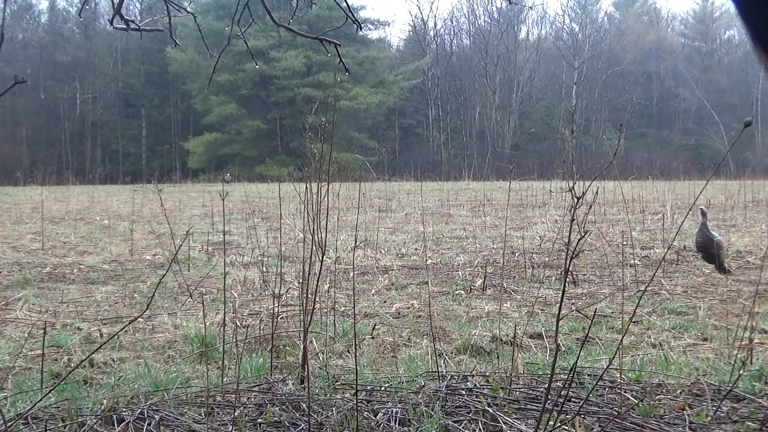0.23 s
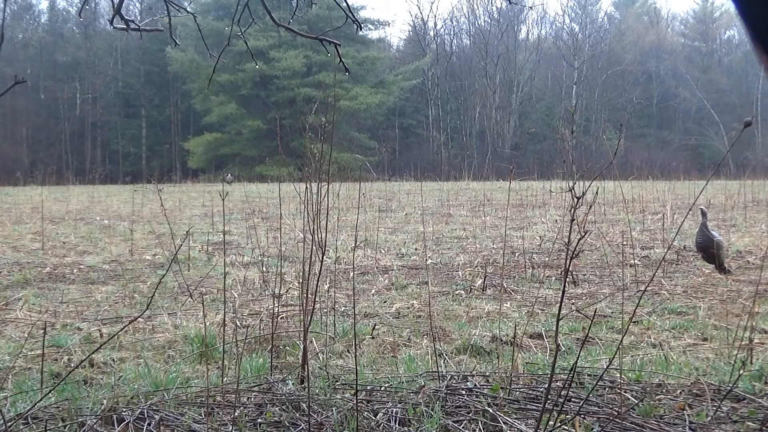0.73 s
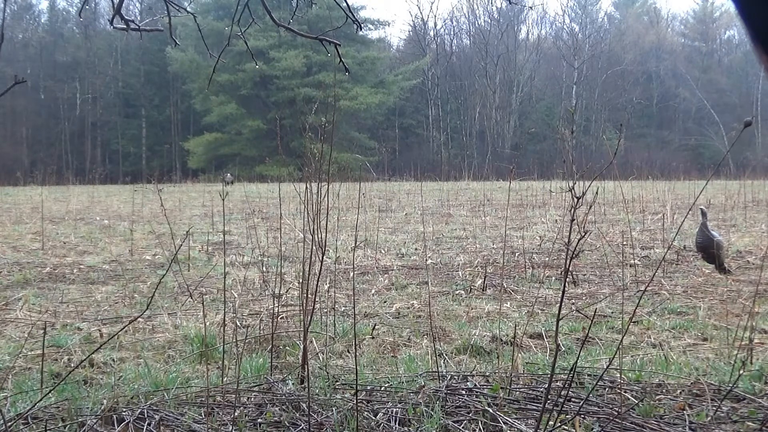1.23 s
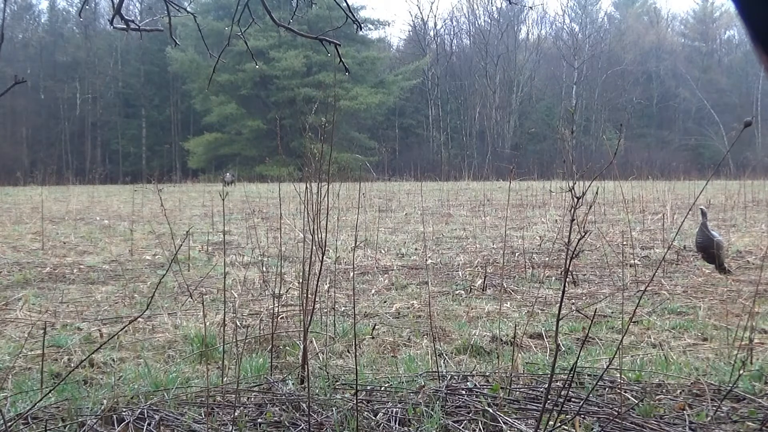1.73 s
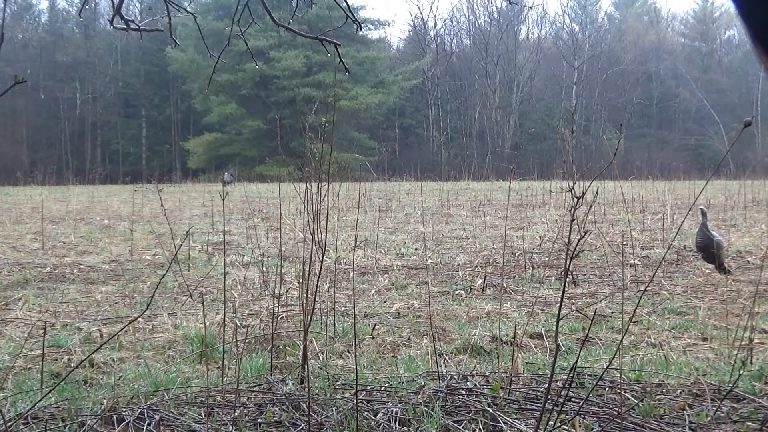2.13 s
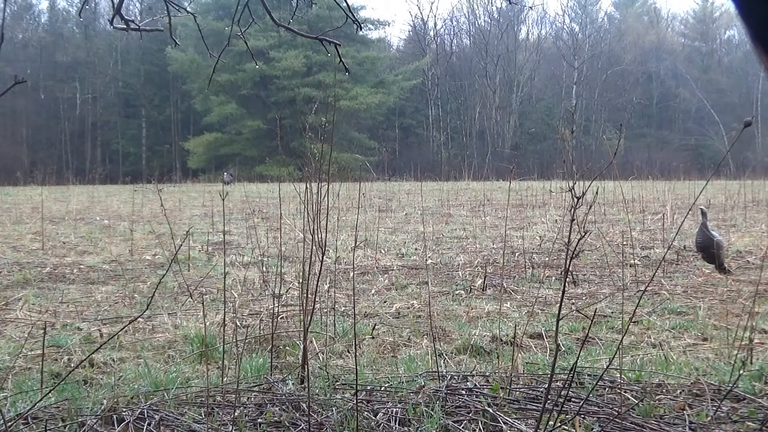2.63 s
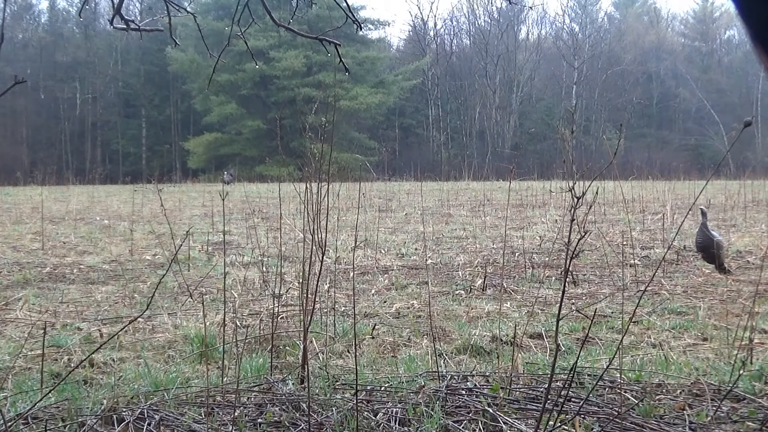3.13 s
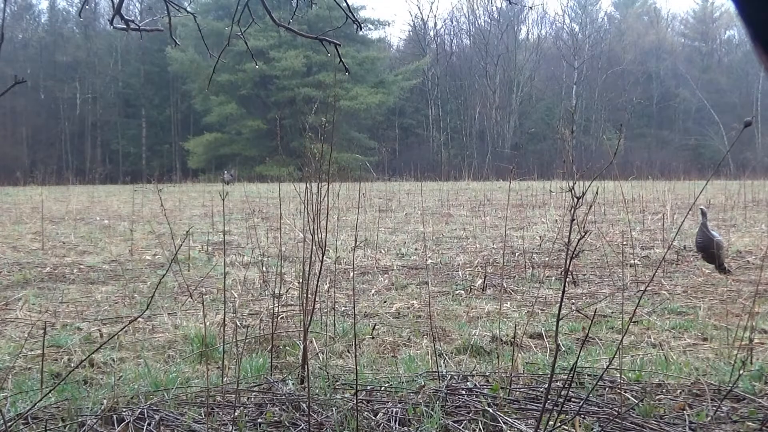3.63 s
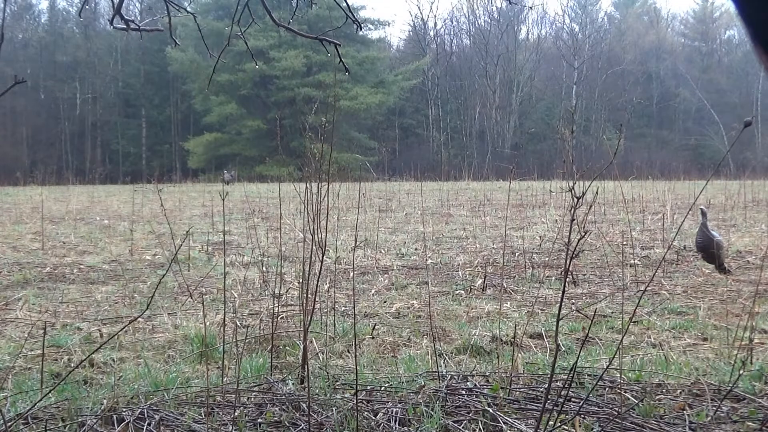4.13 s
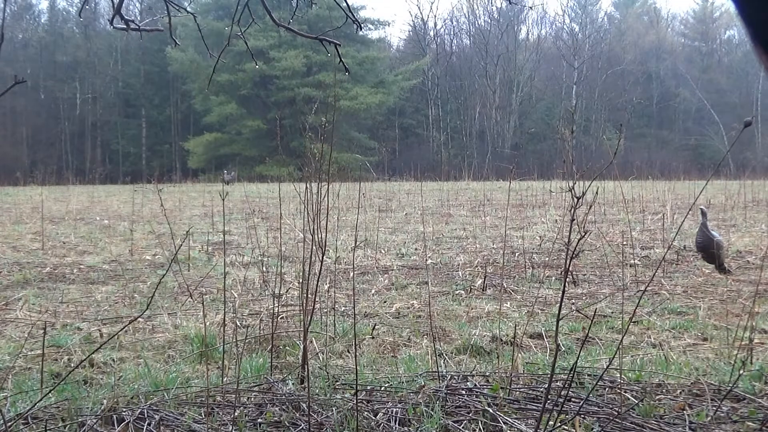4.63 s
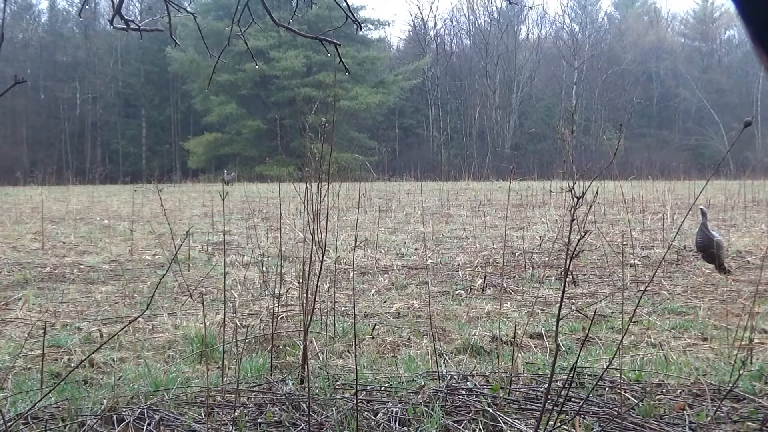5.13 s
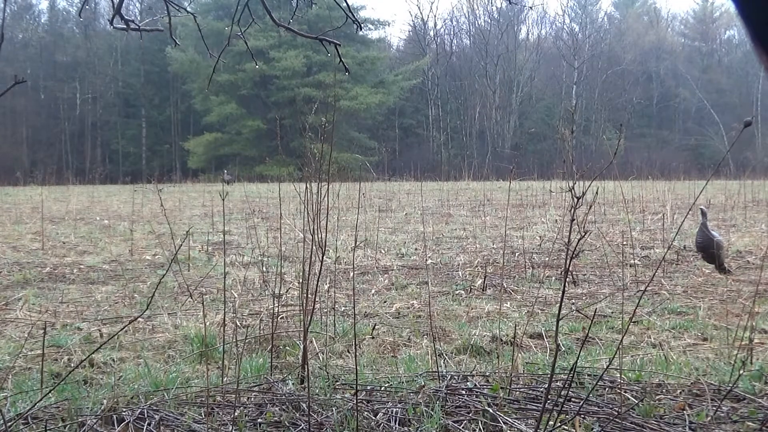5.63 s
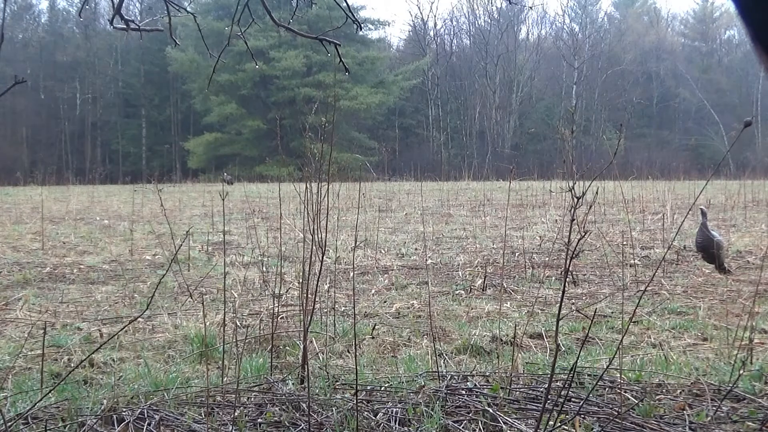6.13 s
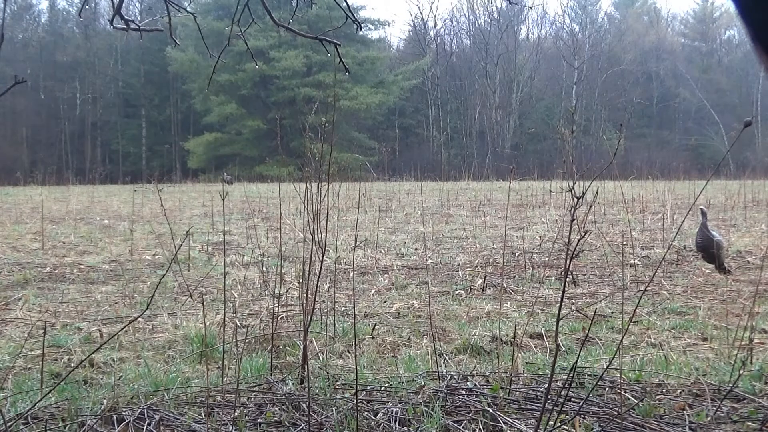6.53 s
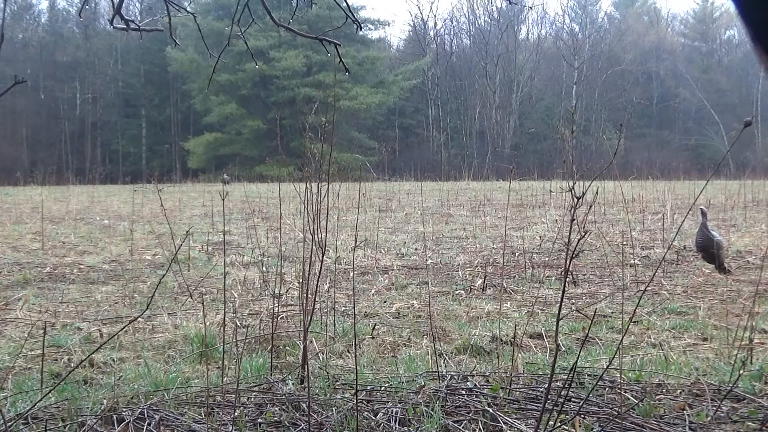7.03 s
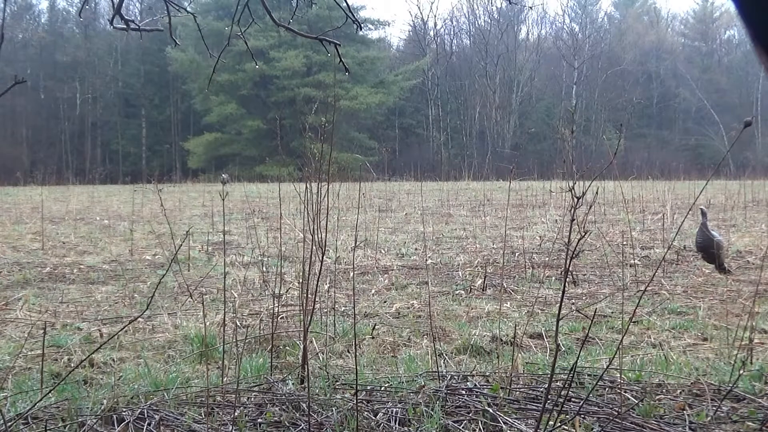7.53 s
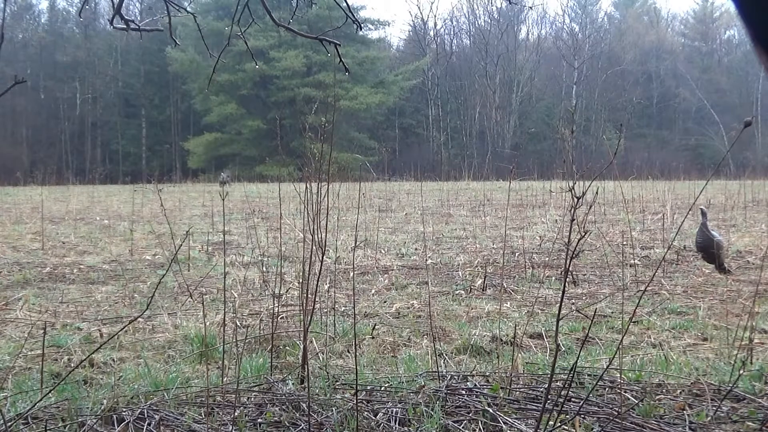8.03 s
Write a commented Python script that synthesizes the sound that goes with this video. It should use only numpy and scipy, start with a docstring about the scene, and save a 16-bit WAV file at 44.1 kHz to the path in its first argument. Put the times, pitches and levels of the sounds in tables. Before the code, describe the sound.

Outdoor stereo pickup at the edge of an open field. A tiny click-like chirp leads into evenly spaced raspy turkey yelps, very near, swelling to full loudness and stopping abruptly. Brush ticks and one thin distant bird peep follow, then a much softer gobble of quick tumbling syllables with woodland echo. It fades into quiet air, faint low hum and a few ticks.

```python
"""Close, raspy turkey yelps at the edge of an open field: membrane pulses and air puffs ring a throat.
Later a turkey gobbles, a rattle of short syllables; the nearest trees reflect it and the woods echo it.
Noise bursts make ticks and a scuff in the brush, a sine a far bird; a low hum and a rush lie underneath.
Loud yelps push the gain down at once, and it creeps back over several seconds."""
import sys
import numpy as np
from scipy import signal
from scipy.fft import rfft, irfft, next_fast_len
from scipy.io import wavfile
from scipy.ndimage import uniform_filter1d, minimum_filter1d, map_coordinates

SR = 44100
rng = np.random.default_rng(int(sys.argv[2]) if len(sys.argv) > 2 else 0)


def store_wav(level_fs):
    """Save 16-bit WAV to argv[1]."""
    pcm = np.round(np.clip(np.atleast_2d(level_fs), -1, 1) * 32767)
    wavfile.write(sys.argv[1], SR, pcm.T.astype(np.int16))


N = 365280
TOP_HZ = 15850  # upper band limit


def yelps():
    """Each yelp falls from a thin whistle to a loud rasp, then bends; a clean fundamental runs under the rasp."""
    # Each row: start in seconds, pitch drop time in seconds, release time after the start in seconds,
    # pitch after the drop in Hz, closing bend in octaves, lateness of the bend (exponent, 1 = even),
    # level in dB, closing sag in dB, roughness 0-1, treble boost in dB, chest boost in dB.
    yelp_rows = [ (.501, 0.007, 0.017, 815, -0.0195, 0.92, -35.5, 3, 1, 2, 15),
                 (.526, .016, 0.049, 845, .05, 1.1, -43.5, 3, .7, 1, -6),
                 (.826, .082, 0.1, 555, 0.31, 1.2, -24, 3.3, 0.7, 7.5, 16),
                 (1.22, 0.04, .11, 583, 0.6, 0.84, -19, 8.8, 0.35, -0.5, 4),
                 (1.57, 0.058, 0.12, 539.4, 0.12, 3, -7, 8.4, 0.43, 3.5, 4.5),
                 (1.947, 0.042, 0.1, 593, .55, 3.5, -12, 9, 0.23, 4.5, 7),
                 (2.303, .032, 0.12, 554.2, .15, 3, -6, 2.3, 0.427, 3, 2),
                 (2.674, 0.021, .091, 546.8, 0.088, 3.4, -6.5, 6.6, 0.36, 1.5, 2),
                 (2.998, .016, 0.0824, 533, -.1, 1.05, -5.5, 1.1, 0.298, -1.5, 0), ]
    # Throat resonance. Each row: frequency in Hz, gain in dB.
    throat_shape = [(330, -36.5), (490, -21.5), (800, -8.5), (1150, -6.3), (1420, -3.5), (1680, -4),
                    (2250, -5.5), (2600, -12.5), (3050, -7.5), (3300, -6.5), (3700, -15), (4400, -22.5),
                    (5700, -28.5), (7800, -16), (9300, -29), (11500, -63)]
    # Stereo balance. Each row: frequency in Hz, left minus right in dB.
    pan_points = [(380, 0), (950, -2.5), (2380, -4.9), (5980, 0.5), (15000, -2)]
    # Stereo phase. Each row: frequency in Hz, lead of left over right in radians.
    lead_points = [(0, 0), (1640, 0.085), (5080, -0.79), (6980, -0.14), (7840, 0.2), (8350, -0.2),
                   (15800, 0.0)]
    whistle_base_db, whistle_db_per_octave, whistle_rough_db = -13.5, 13, -9.5
    bite_hz = 4430

    track = np.zeros((2, N))
    t = np.arange(SR // 5) / SR
    for (start, drop, length, base_hz, lift, lateness, level_db, sag_db,
         rough, treble_db, chest_db) in yelp_rows:
        pitch_hz, swell_db, bite_db = yelp_gesture(t, drop, length, base_hz, lift, lateness, sag_db)
        # above 580 Hz the overtones break up further into hoarse noise
        octaves_up = np.log2(np.maximum(pitch_hz, 580) / 580)
        hoarse = np.clip(rough + .1 + .9 * octaves_up, 0, .92)
        source = syrinx(pitch_hz, hoarse, jitter=.12, jitter_rate=600,
                        flutter_hz=135, flutter=.3 + .8 * min(rough, .45))

        def voicing(hz):
            treble = treble_db * above(hz, 2500)
            chest = chest_db * (1 - above(hz, 1550))
            return throat_rings(hz) * amp(treble + chest)

        rasp = filtered(resonate(source, throat_shape), voicing)
        bite = filtered(rasp, lambda hz: above(hz, bite_hz))
        rasp = rasp + (amp(bite_db) - 1) * bite
        rasp = nearby(rasp, scatter_db=-3, t60=.06, width=1.3)

        # the higher the pitch, the more of the voice lies in its fundamental
        whistle_db = (whistle_base_db + whistle_db_per_octave * np.log2(pitch_hz / 550)
                      + whistle_rough_db * rough)
        whistle_hz = pitch_hz * (1 + .02 * wobble(250, len(t)))
        whistle = np.sqrt(2) * np.sin(2 * np.pi * np.cumsum(whistle_hz) / SR)
        voice = evened(rasp, size=550) + amp(whistle_db) * whistle
        voice = voice * amp(level_db + swell_db)
        for ear, sound in zip(track, voice):
            add(ear, start, sound)

    sides = np.array([[.5], [-.5]])

    def placement(hz):
        return amp(sides * along(pan_points, hz)) * np.exp(1j * sides * along(lead_points, hz))

    close = nearby(track, scatter_db=-9.5, t60=0.1, width=0.26, tilt=0.7)
    return filtered(close, placement)


def yelp_gesture(t, drop, length, base_hz, lift, lateness, sag_db):
    """Pitch, relative level and bite: it swells as the pitch drops, sags and dulls as it closes, is let go."""
    entry_octaves, entry_db, release_db_per_s, bite_closing_db = .9, 29.5, 1055, -3.5
    entering = np.maximum(1 - t / drop, 0)
    closing = np.clip((t - drop) / max(length - drop, .005), 0, 1.2)
    pitch_hz = base_hz * 2 ** (entry_octaves * entering ** 2.2 + lift * closing ** lateness)
    entry = -entry_db * entering ** 2
    sag = -sag_db * np.minimum(closing, 1) ** 2
    release = -release_db_per_s * np.maximum(t - length, 0)
    return pitch_hz, entry + sag + release, bite_closing_db * closing ** 2


def throat_rings(hz):
    """Narrow resonances of the yelping throat, added to the direct sound."""
    # Each row: centre in Hz, width in Hz, level of the added resonance in dB.
    ring_rows = [(1507, 59, 4.5), (1697, 51, 11), (1800, 68, 9.5), (1970, 41, 4), (3070, 70, -3),
                 (3510, 65, 4), (8050, 110, -12)]
    response = 1
    for centre, width, db in ring_rows:
        response = response + amp(db) * 1j * hz * width / (centre ** 2 - hz ** 2 + 1j * hz * width)
    return response


def syrinx(pitch_hz, rough, jitter, jitter_rate, flutter_hz, flutter):
    """Membrane pulses; roughness scatters their timing and trades them for puffs of air."""
    size = len(pitch_hz)
    jittered_hz = pitch_hz * (1 + jitter * rough * wobble(jitter_rate, size))
    phase = 2 * np.pi * np.cumsum(jittered_hz) / SR
    pulses = unit(sum(np.cos(k * phase) * (k * pitch_hz < TOP_HZ) for k in np.arange(1, 29)))
    air = unit(rng.standard_normal(size) * (1 + np.cos(phase)))
    air = filtered(air, lambda hz: hz ** 2 / (hz ** 2 + 750 ** 2))
    # slower, uneven flapping of the membrane puts sidebands beside each harmonic
    flap_hz = flutter_hz * (1 + .45 * wobble(130, size))
    flap = np.sin(2 * np.pi * np.cumsum(flap_hz) / SR)
    share = np.clip(rough, 0, 1)
    return (np.sqrt(1 - share) * pulses + np.sqrt(share) * air) * (1 + flutter * flap)


def gobble():
    """A rattle of short syllables, each with a hollow body and a bright rasp from the same membrane."""
    # Each row: centre in seconds, length scale in seconds, pitch at the centre in Hz, body level in dB,
    # body centre in Hz, rasp level in dB, roughness 0-1.
    syllable_rows = [ (5.680, 0.021, 549.4, -20.5, 1670, -35, 0.21),
                     (5.743, 0.015, 646, -20.5, 1360, -23, 0.17), (5.815, .015, 641, -36, 1347, -37.5, 0.5),
                     (5.866, 0.013, 660, -26.5, 1600, -29, .25),
                     (5.904, 0.017, 549.6, -25, 1225, -24, 0.32),
                     (5.943, .018, 630.7, -20.5, 1930, -24.5, .22),
                     (6.009, 0.0182, 598, -33, 1410, -32.5, .25), (6.062, .024, 604.6, -30, 1370, -29, 0.3),
                     (6.109, 0.023, 634, -22, 1800, -20.5, 0.26), (6.182, .028, 584, -36, 1982, -36.5, .25),
                     (6.219, 0.015, 600, -43, 1380, -34.5, .25),
                     (6.302, .017, 561.4, -31.5, 1760, -38, 0.09),
                     (6.362, 0.0179, 572, -28.5, 1920, -32.5, 0.02),
                     (6.387, 0.0175, 609, -39, 1800, -30.5, 0.38),
                     (6.467, 0.014, 556, -35.5, 1790, -39.5, 0), (6.521, 0.022, 585, -46, 1932, -42, 0.2), ]
    # Resonance of the body. Each row: frequency in Hz, gain in dB.
    body_shape = [(500, -29), (850, 4), (1080, -4), (1400, -7), (1750, 2), (2250, 0), (2800, -4),
                  (5000, -29)]
    # Resonance of the rasp. Each row: frequency in Hz, gain in dB.
    rasp_shape = [(1500, -36.5), (2300, -0.5), (2600, -3), (3200, 1), (5800, -4.5), (7500, -7),
                  (10000, -11.5), (15000, -26)]
    arch_octaves = .05  # pitch fall one length away from the centre
    # rasp centre in the first syllable; it sits lower when louder and falls as the gobble runs down
    first_rasp_hz, rasp_octaves_per_db, rasp_fall_octaves_per_s = 4600, -0.17, 1

    track = np.zeros(N)
    t = np.arange(-SR // 20, SR // 20) / SR
    first_s, *_, first_rasp_db, _ = syllable_rows[0]
    for s, length, pitch_hz, body_db, body_hz, rasp_db, rough in syllable_rows:
        arch = 2 ** (-arch_octaves * np.minimum((t / length) ** 2, 2))
        rasp_octaves = (rasp_octaves_per_db * (rasp_db - first_rasp_db)
                        - rasp_fall_octaves_per_s * (s - first_s))
        rasp_hz = first_rasp_hz * 2 ** rasp_octaves
        source = syrinx(pitch_hz * arch, rough, jitter=0.0885, jitter_rate=303,
                        flutter_hz=165.6, flutter=0.28)
        body = filtered(resonate(source, body_shape), lambda hz: hump(hz, body_hz, octaves=0.34) ** 2)
        rasp = filtered(resonate(source, rasp_shape), lambda hz: hump(hz, rasp_hz, octaves=0.7))
        # opens faster than it closes
        swell = 1 / np.cosh(2 * t / length) / np.cosh(1.06 * np.minimum(t, 0) / length)
        syllable = swell * (amp(body_db) * unit(body) + amp(rasp_db) * unit(rasp))
        # the head jerks, so every syllable meets the ground differently
        add(track, s + t[0], nearby(syllable, scatter_db=-6.5, t60=0.059, width=0)[0])
    return track


def trees(x):
    """The nearest trees throw back one dull copy."""
    delay_s, gain_db, centre_hz = .041, -6, 1450

    def reflection(hz):
        tone = hump(hz, centre_hz, octaves=0.42) ** 2
        return amp(gain_db) * tone * np.exp(-2j * np.pi * hz * delay_s)

    return filtered(x, reflection)


def woods(x):
    """The tree line answers with a diffuse stereo tail that fades at its own rate in each band."""
    # Each row: frequency in Hz, 60 dB decay time in seconds.
    decay_points = [(500, 5.8), (1100, 2.3), (1750, 1.95), (3500, 2.1), (9000, .25)]
    # Each row: frequency in Hz, starting level in dB.
    tone_points = [(500, -12), (950, 12), (1100, 8), (1350, -7.5), (1700, -4), (3200, -7), (8000, -45)]
    noise = rng.standard_normal((2, SR * 3 // 2))
    hz, t, z = signal.stft(noise, SR, nperseg=256)
    fade_db = along(tone_points, hz)[:, None] - 60 * t / along(decay_points, hz)[:, None]
    onset = 1 - np.exp(-t / 0.0067)
    tail = signal.istft(z * amp(fade_db) * onset, SR, nperseg=256)[1]
    echo = signal.fftconvolve(x[None], tail / np.sqrt(SR / 10), axes=1)[:, :N]
    mid, side = echo * [[1], [.35]]
    return np.array([mid + side, mid - side])


def ticks():
    """Dry stalks tick: a brief bright noise burst with a broad snap that dies sooner."""
    # The clearest ticks. Each row: start in seconds, level in dB, burst centre in Hz.
    tick_rows = [(0.3325, -45, 4900), (.7837, -46.5, 8637), (1.784, -43.5, 6450), (3.268, -44.5, 3300),
                 (3.482, -36, 7900), (4.0647, -35.5, 8860), (4.8448, -44.5, 8600), (6.254, -37, 7300),
                 (6.6164, -43.5, 7250), (6.857, -47, 8100), (8.0045, -39.5, 5800), (8.026, -43, 5700)]
    faint_per_s, faint_db, faint_hz = 0.95, -48, 8200  # spread half an octave either way
    tick_t60_s, snap_db, snap_t60_s = 0.058, -3, 0.043  # snap level relative to the burst

    track = np.zeros(N)
    t = np.arange(SR // 6) / SR
    chances = rng.random((round(faint_per_s * N / SR), 2))
    faint = [(when * N / SR, faint_db, faint_hz * 2 ** (size - .5)) for when, size in chances]
    for s, db, centre_hz in tick_rows + faint:
        bright, broad = rng.standard_normal((2, len(t)))
        burst = filtered(bright, lambda hz: hump(hz, centre_hz, octaves=0.38) ** 2 / (1 + (hz / 11000) ** 8))
        snap = filtered(broad, lambda hz: hump(hz, 2000, octaves=1.2) ** 2)
        burst = unit(burst) * amp(db - 60 * t / tick_t60_s)
        snap = unit(snap) * amp(db + snap_db - 60 * t / snap_t60_s)
        add(track, s, burst + snap)
    return track


def scuff():
    """Something shifts in the leaves: a soft, dull rustle of unevenly swelling noise."""
    # Centre in seconds, length scale in seconds, level in dB, centre frequency in Hz.
    s, length, db, centre_hz = (3.48, .06, -40, 850)
    track = np.zeros(N)
    t = np.arange(-SR // 5, SR // 5) / SR
    rustle = filtered(rng.standard_normal(len(t)), lambda hz: hump(hz, centre_hz, octaves=1.56) ** 4)
    rustle = unit(rustle * amp(5.1 * wobble(81, len(t))))
    add(track, s + t[0], amp(db) * np.exp(-(t / length) ** 2) * rustle)
    return track


def peep():
    """A small bird gives a thin, brief whistle far off: a sine under a bell-shaped swell."""
    # Centre in seconds, pitch in Hz, peak level in dB, length scale in seconds.
    s, hz, db, length = (4.868, 2730, -45.5, .013)
    t = np.arange(N) / SR
    return amp(db) * np.exp(-((t - s) / length) ** 2) * np.sin(2 * np.pi * hz * t)


def distance():
    """A far engine hums, as centred narrow-band noise, in a broad stereo rush of air."""
    # Each row: time in seconds, hum level in dB, rush level in dB.
    level_rows = [(0, -37, -39.8), (1.5, -39, -40), (3, -41.5, -39.5), (4.5, -44.5, -37),
                  (5.4, -38.5, -36.8), (6.2, -37, -33.5), (7, -44.5, -39), (8.28, -48, -39)]
    # Hum spectrum. Each row: frequency in Hz, relative density in dB per Hz.
    hum_points = [(70, -34), (115, -24.5), (134, -2.5), (146, -1.5), (160, -18), (220, -17.5), (330, -56)]
    # Rush spectrum. Each row: frequency in Hz, relative density in dB per Hz.
    rush_points = [(13, -42), (22, -20.5), (70, -2.5), (108, -3.5), (138, -6.5), (172, -8.5), (239, -9),
                   (392, -18), (426, -20), (516, -16.5), (970, -15.5), (2530, -29), (2750, -29),
                   (4040, -33), (15500, -42)]
    # Each row: frequency in Hz, left-right correlation of the rush.
    alike_points = [(60, 1.0), (180, 1.0), (550, 0.8815), (1650, 0.421), (4970, 0.56), (15000, 1)]

    s, hum_levels, rush_levels = np.transpose(level_rows)
    t = np.arange(N) / SR
    hum_db, rush_db = np.interp(t, s, hum_levels), np.interp(t, s, rush_levels)
    hum = unit(filtered(rng.standard_normal(N), lambda hz: amp(along(hum_points, hz))))

    def mid_side(hz):
        turn = np.arccos(np.clip(along(alike_points, hz), -1, 1)) / 2
        return amp(along(rush_points, hz)) * [np.cos(turn), np.sin(turn)]

    mid, side = filtered(rng.standard_normal((2, N)), mid_side)
    rush = unit(np.array([mid + side, mid - side]))
    return amp(hum_db) * hum + amp(rush_db) * rush


def nearby(x, scatter_db, t60, width, tilt=0):
    """Ground and brush scatter sound, differently to each side by width; thin stalks (tilt) favour treble."""
    t = np.arange(SR // 4) / SR
    noise = rng.standard_normal(len(t)) + width * rng.standard_normal((2, len(t)))
    scatter = unit(noise * amp(-60 * t / t60))
    tail = amp(scatter_db) * filtered(scatter, lambda hz: ((hz + 1) / 2000) ** tilt) / np.sqrt(len(t))
    return x + signal.fftconvolve(np.atleast_2d(x), tail, axes=1)[:, :x.shape[-1]]


def resonate(x, shape, size=2048):
    """x through a cavity of (Hz, dB) shape; minimum phase, so it rings only after it is struck."""
    cepstrum = irfft(np.log(amp(along(shape, np.fft.rfftfreq(size, 1 / SR)))))
    cepstrum[1:size // 2] *= 2
    cepstrum[size // 2 + 1:] = 0
    return signal.fftconvolve(x, irfft(np.exp(rfft(cepstrum))))[:len(x)]


def filtered(x, response):
    """x times a response of frequency."""
    size = x.shape[-1]
    m = next_fast_len(size + 4096)
    return irfft(rfft(x, m) * response(np.fft.rfftfreq(m, 1 / SR)), m)[..., :size]


def hump(hz, centre_hz, octaves):
    """Gain of a broad resonance around a centre."""
    return 1 / np.sqrt(1 + (np.log2((hz + 1) / centre_hz) / octaves) ** 2)


def above(hz, edge_hz):
    """Steep step from 0 below an edge to 1 above it."""
    return hz ** 8 / (hz ** 8 + edge_hz ** 8)


def along(points, hz):
    """(Hz, value) points read on a log axis."""
    f, v = np.transpose(points)
    return np.interp(np.log(hz + 1), np.log(f + 1), v)


def wobble(rate, size):
    """A smooth random curve, rate knots a second."""
    return map_coordinates(rng.standard_normal(size), [np.arange(size) * rate / SR], order=2)


def evened(x, size):
    """x with its slow swells evened out to rms 1 over size samples."""
    return x / np.sqrt(np.abs(uniform_filter1d(np.mean(x ** 2, axis=0), size=size)) + 1e-12)


def amp(db):
    """Decibels to gain."""
    return 10 ** (np.asarray(db) / 20)


def unit(x):
    """x at rms 1."""
    return x / np.sqrt(np.mean(x ** 2) + 1e-20)


def add(track, s, sound):
    """Mix a sound into the track at s seconds."""
    place = track[max(round(s * SR), 0):][:len(sound)]
    place += sound[:len(place)]


def scene():
    """Yelps from close on the right; gobble, ticks, scuff and peep from straight ahead; hum and rush behind."""
    call, rattle = yelps(), gobble()
    ahead = rattle + trees(rattle) + ticks() + scuff() + peep()
    ahead = nearby(ahead, scatter_db=-7.0, t60=0.095, width=0.79)
    return call + ahead + amp(-4.5) * woods(rattle) + distance()


def record(dry):
    """Gain ducks at once on loud sound and recovers slowly; a limiter holds the peaks; then the band limit."""
    threshold_db, recovery_db_per_s, ceiling = -11, 1.4, .95
    power = np.abs(uniform_filter1d(np.mean(dry ** 2, axis=0), size=1300))
    excess_db = np.maximum(10 * np.log10(power + 1e-12) - threshold_db, 0)
    recovered_db = recovery_db_per_s * np.arange(N) / SR
    duck_db = np.maximum.accumulate(excess_db + recovered_db) - recovered_db
    ducked = dry * amp(-duck_db)
    room = np.minimum(ceiling / (np.abs(ducked).max(axis=0) + 1e-9), 1)
    limited = ducked * uniform_filter1d(minimum_filter1d(room, size=90), size=90)
    return filtered(limited, lambda hz: hz < TOP_HZ)


dry = scene()
out = record(dry)
store_wav(out)
```